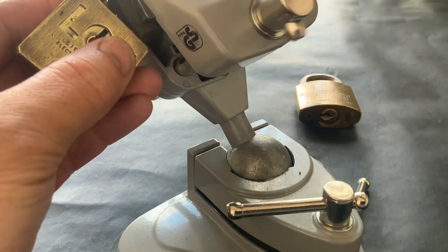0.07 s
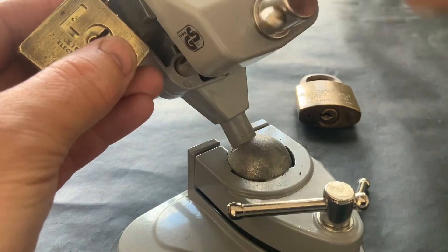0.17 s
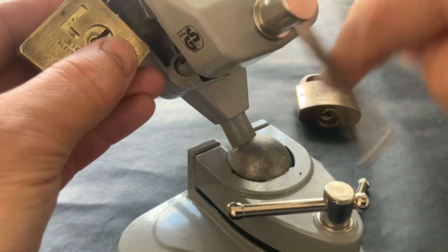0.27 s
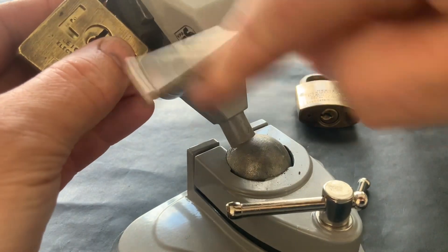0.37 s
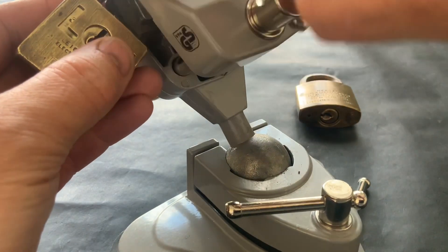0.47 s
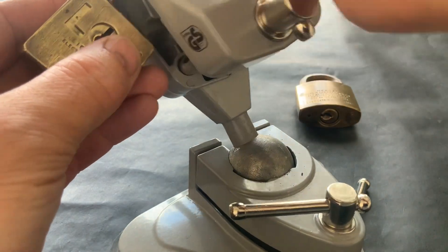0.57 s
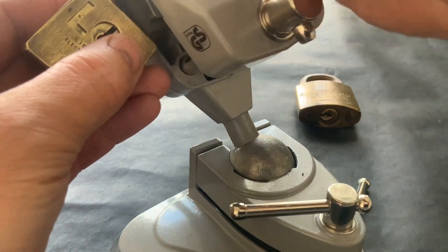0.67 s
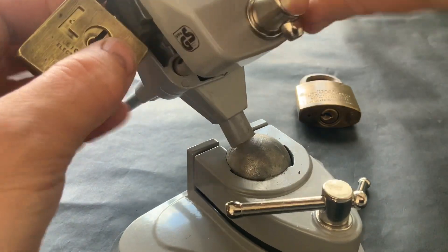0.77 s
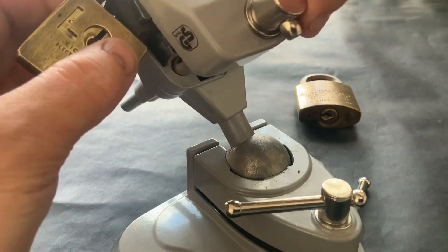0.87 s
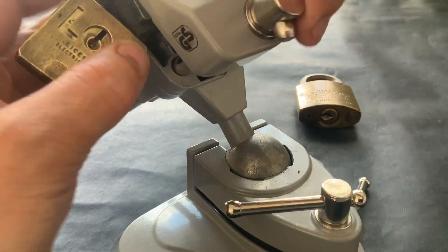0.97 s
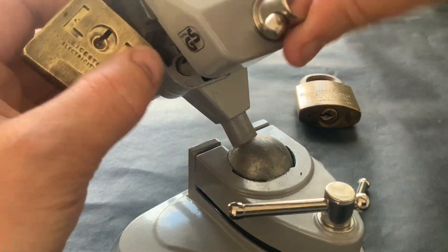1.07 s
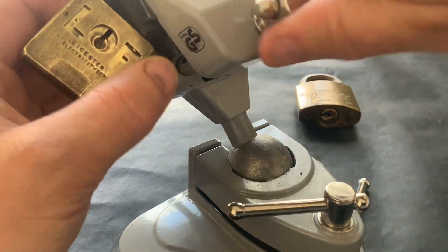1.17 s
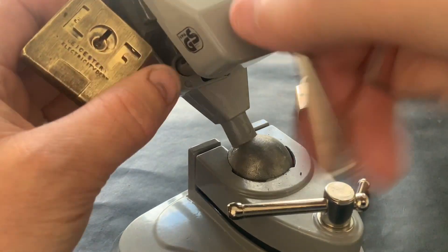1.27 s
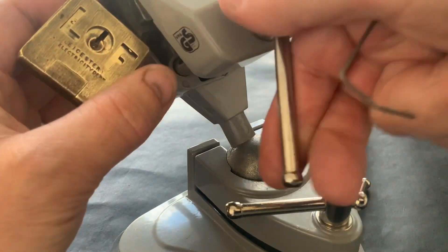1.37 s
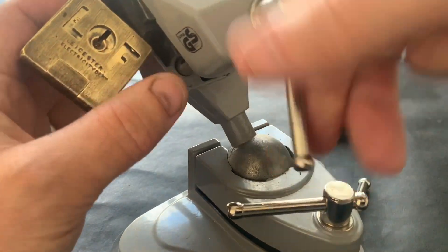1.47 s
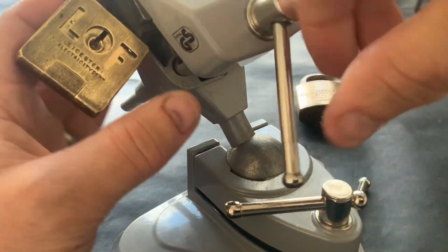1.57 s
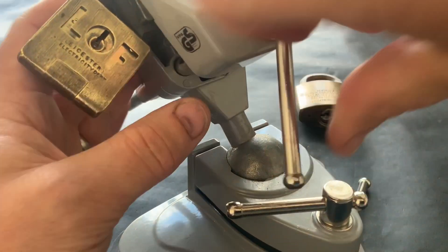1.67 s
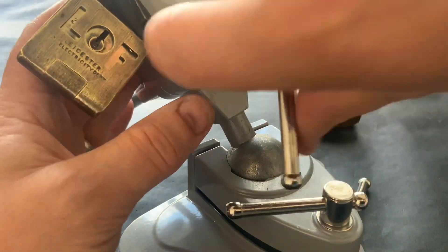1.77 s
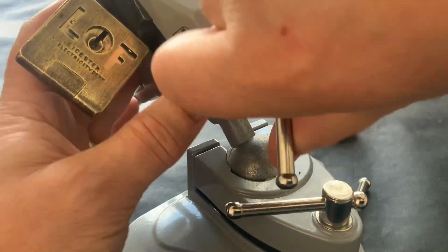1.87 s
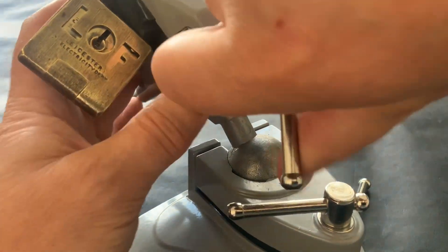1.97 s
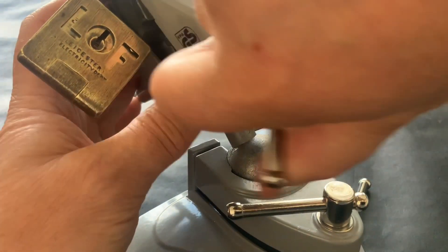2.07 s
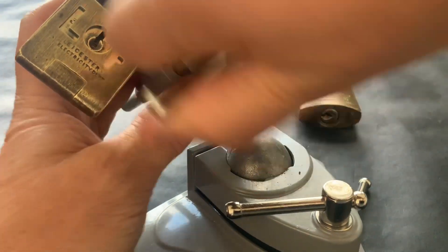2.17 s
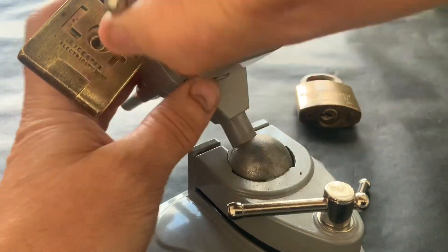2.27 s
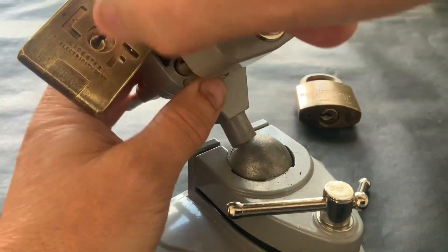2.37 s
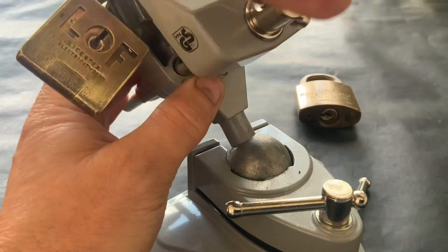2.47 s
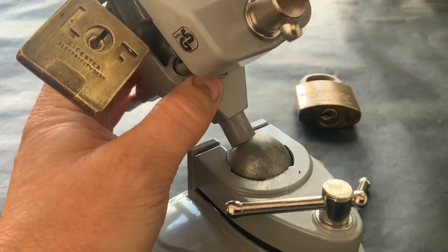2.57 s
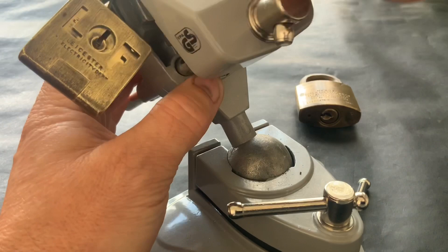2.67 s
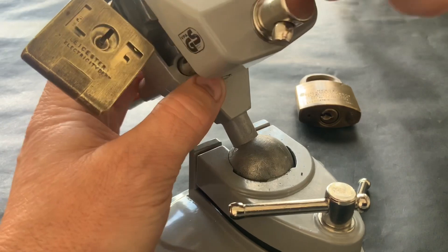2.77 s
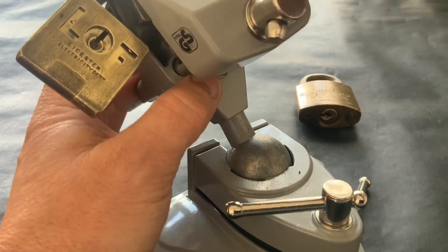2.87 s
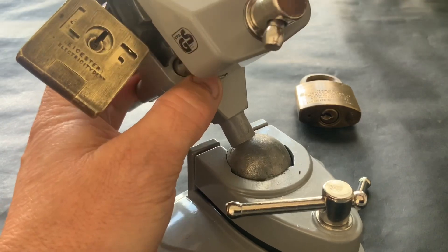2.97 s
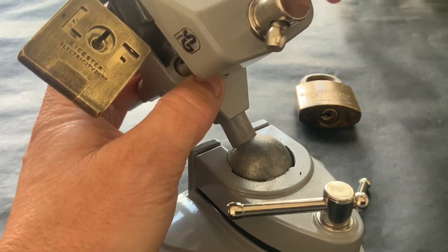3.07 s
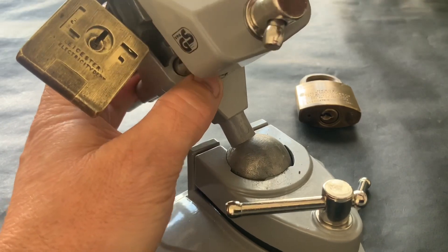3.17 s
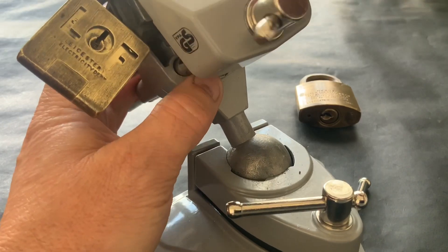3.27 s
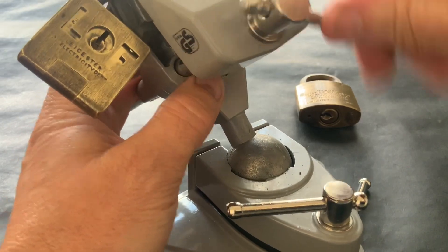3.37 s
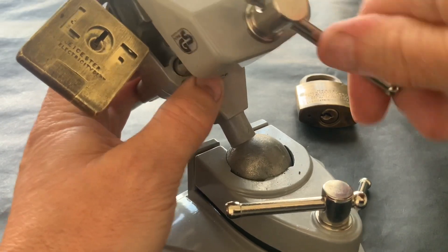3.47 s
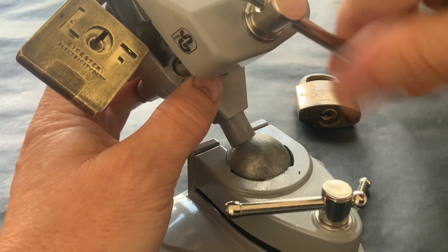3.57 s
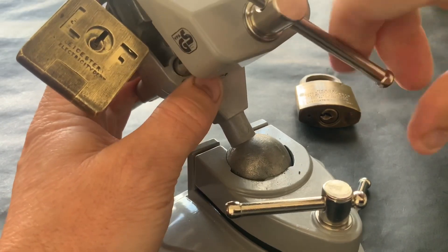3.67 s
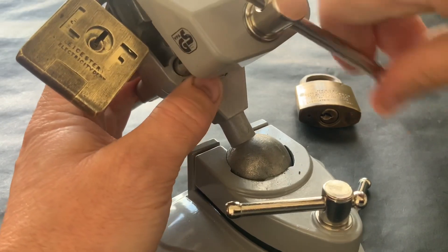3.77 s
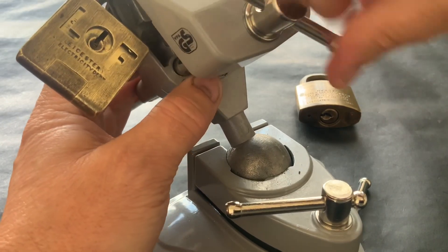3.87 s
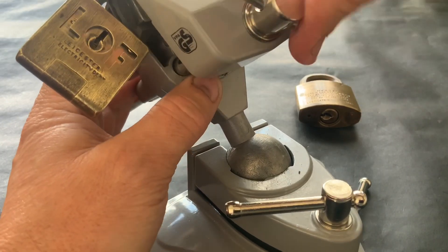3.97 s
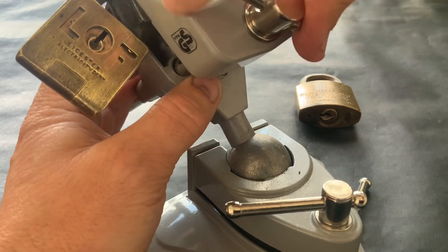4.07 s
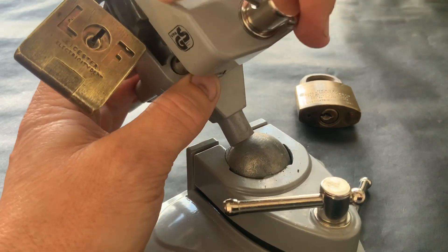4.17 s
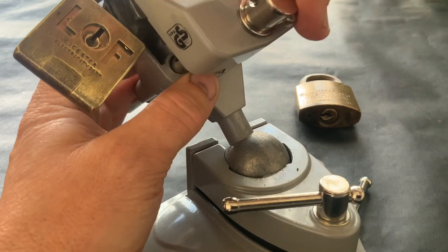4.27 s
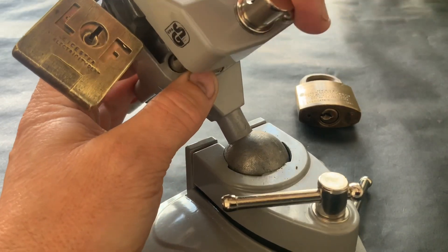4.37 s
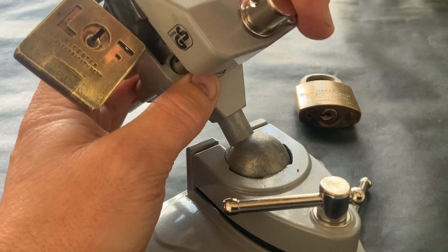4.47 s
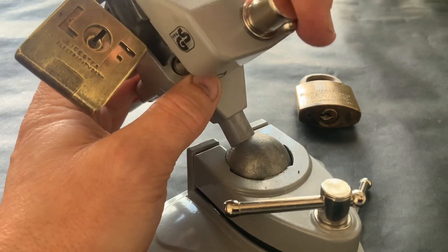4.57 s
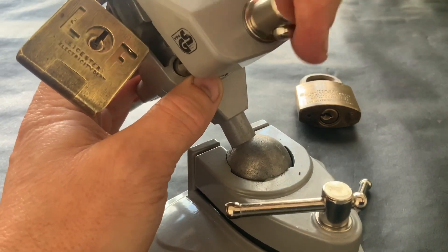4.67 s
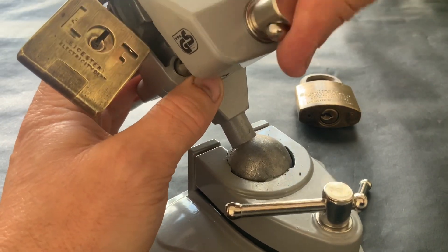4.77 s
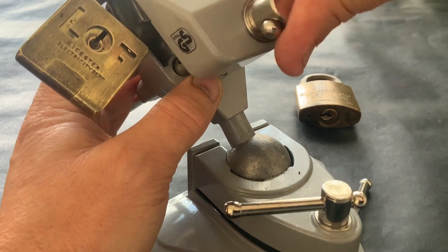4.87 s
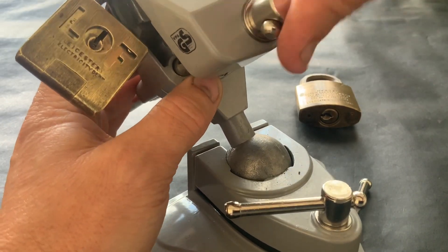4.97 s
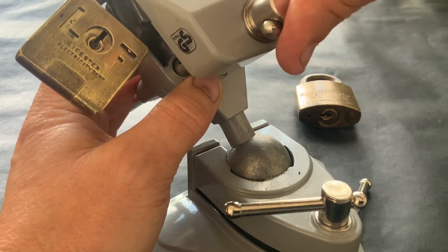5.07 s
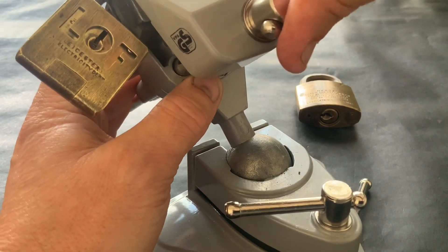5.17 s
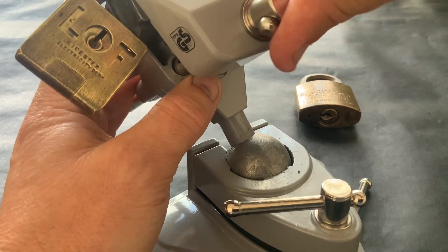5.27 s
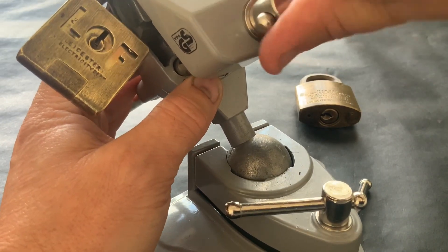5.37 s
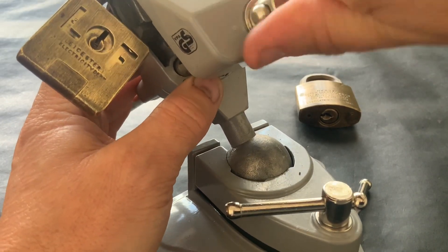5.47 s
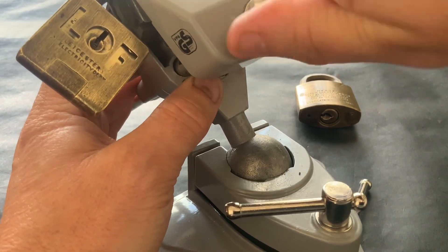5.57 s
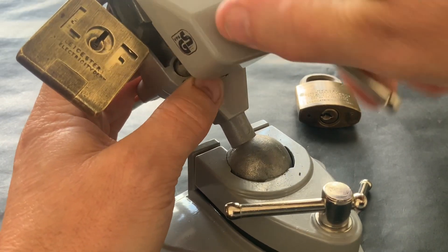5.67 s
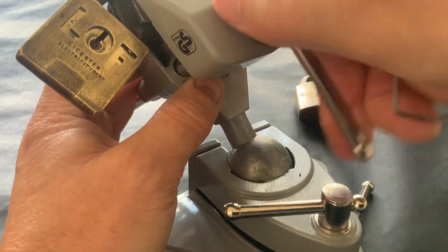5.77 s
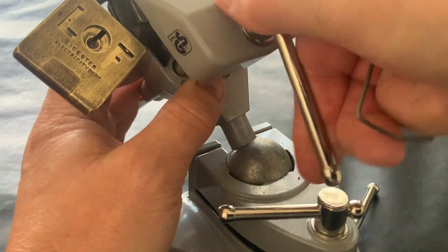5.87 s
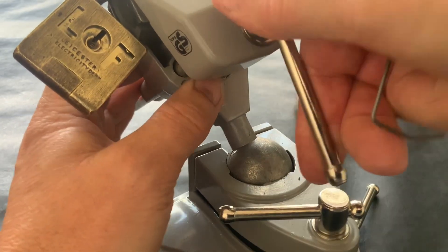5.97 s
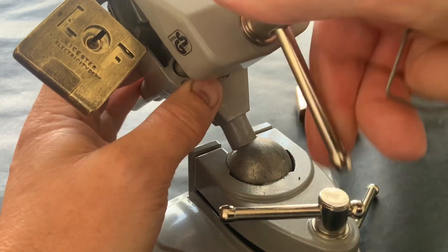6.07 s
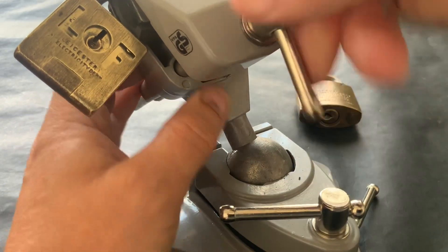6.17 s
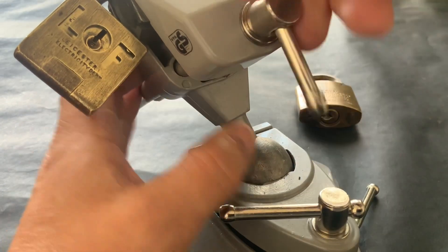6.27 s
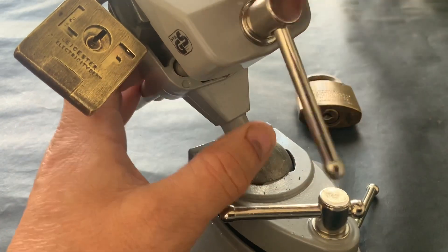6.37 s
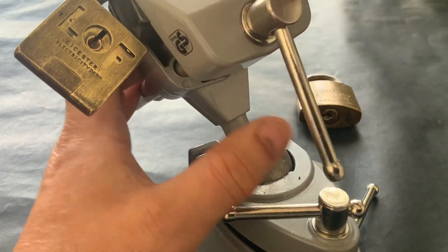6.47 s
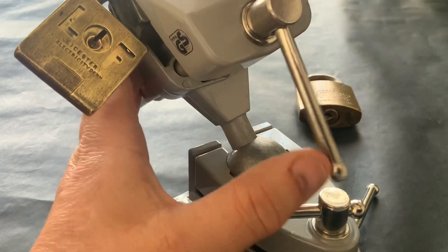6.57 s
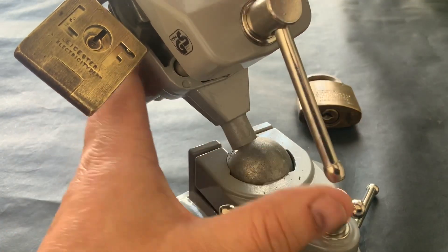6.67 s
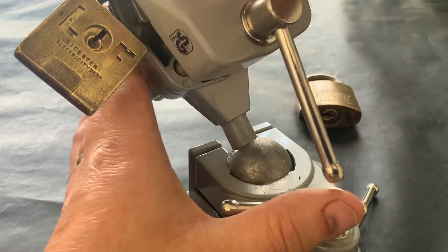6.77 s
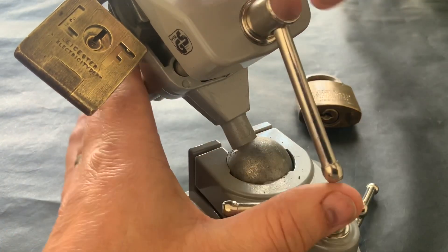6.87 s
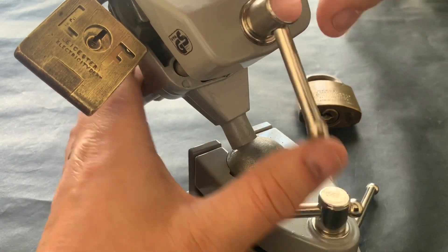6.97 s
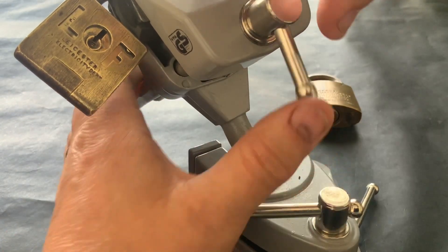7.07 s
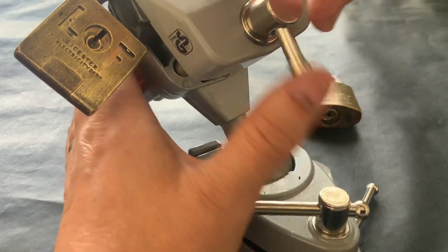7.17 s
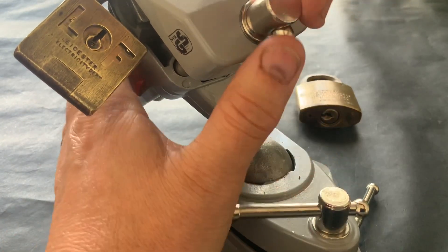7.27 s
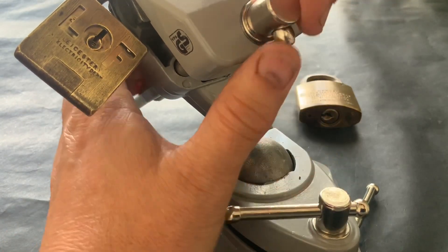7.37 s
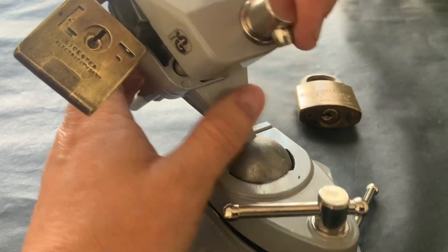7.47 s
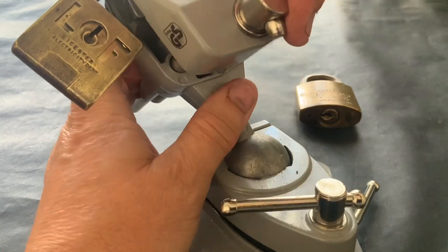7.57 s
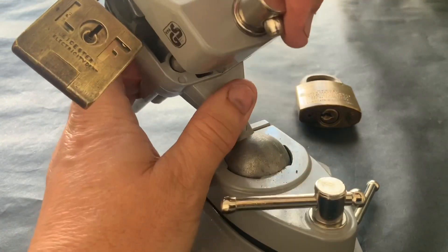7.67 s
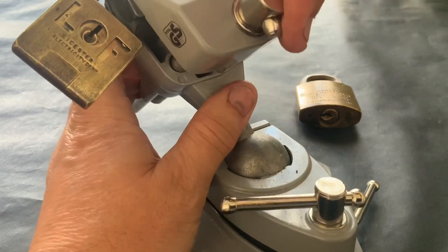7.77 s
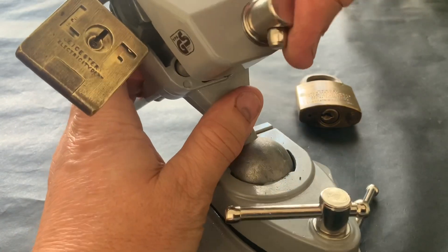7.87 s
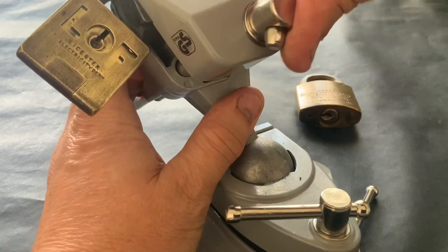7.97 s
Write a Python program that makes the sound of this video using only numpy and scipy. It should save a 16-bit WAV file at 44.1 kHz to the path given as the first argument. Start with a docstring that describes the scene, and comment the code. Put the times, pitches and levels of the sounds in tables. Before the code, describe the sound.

A small cast vise is worked close to stereo microphones in a quiet room, slightly nearer the right. From 0 to 0.45 s come crowded hollow knocks, a rough scrape, small clinks, soft bench thumps and a tiny groan. Sparse ticks and faint rubbing follow. At 1.2 s the screw judders in a brief buzzing burst, then at 1.45 to 1.5 s the steel handle clinks brightly. Quiet knocks, scuffs and a dull thump at 2.8 s lead to a hissing scrape with a short dry squeak at 3.75 to 3.9 s, ending in a bright clink. From 4 to 5.6 s it is nearly still, just faint knocks. Near 6.1 s scraping resumes; at 6.26 to 6.35 s the handle drops through with the loudest, high singing clatter, and another clink at 6.5 s. Scrapes and a double clink come around 6.85 to 7.2 s, a soft thump at 7.4 s, then light rubbing over low room noise and hiss.

```python
"""A knock, a scrape and a steel clink come first: a padlock is clamped in a small bench vise,
close to the microphones in a small room. The screw scrapes as it turns and once judders; the loose
handle slides through its hole and clinks against its stops; hands bump the bench. Contacts are
noise cracks over dying modes, friction is coloured noise and tones, and room and hiss lie behind."""
import sys
import numpy as np
from scipy import signal
from scipy.fft import rfft, irfft
from scipy.io import wavfile

SR = 44100
rng = np.random.default_rng(int(sys.argv[2]) if len(sys.argv) > 2 else 0)


def generate_wav(sig):
    """Save sig (samples, or channels by samples) to the path in sys.argv[1] as 16-bit PCM at SR."""
    pcm = np.round(np.clip(np.atleast_2d(sig).T, -1, 1) * 32767).astype(np.int16)
    wavfile.write(sys.argv[1], SR, pcm)


N = 353020
TIME = np.arange(N) / SR  # seconds


def amp(db):
    """Decibels to gain."""
    return 10 ** (np.asarray(db) / 20)


def unit(x):
    """Scales to rms 1."""
    return x / np.sqrt(np.mean(x ** 2) + 1e-20)


def blow(x):
    """Scales a short sound so that its energy equals a hundredth of a second at rms 1."""
    return x / np.sqrt(np.sum(x ** 2) / (SR / 100) + 1e-20)


def read(points, hz):
    """Reads a spectrum on a log-frequency axis."""
    f, value = np.transpose(points)
    return np.interp(np.log(hz + 1), np.log(f), value)


def level(s, db):
    """A gain curve in dB, silent outside its span."""
    return amp(np.interp(TIME, s, db, left=-200, right=-200))


def add(mix, s, sound):
    """Mixes a sound in at time s."""
    part = mix[max(round(s * SR), 0):][:len(sound)]
    part += sound[:len(part)]


def response(points, size=2048):
    """Causal (minimum-phase) impulse response with the given spectrum."""
    hz = abs(np.fft.fftfreq(size, 1 / SR))
    log_gain = np.log(amp(read(points, hz)))
    return np.fft.ifft(np.exp(np.conj(signal.hilbert(log_gain)))).real[:size // 2]


def colour(x, points):
    """Passes x through a spectrum."""
    return signal.oaconvolve(x, response(points))[:len(x)]


def drift(hz):
    """Slow random wander, with hz fresh values of rms 1 per second joined by lines."""
    knots = rng.standard_normal(N // 20)
    return np.interp(TIME * hz, np.arange(len(knots)), knots)


def held(start, length, rise, release):
    """Gain of one movement: it builds up, holds, and dies away."""
    age = np.maximum(TIME - start, 0)
    return np.minimum(age / rise, 1) * np.exp(-np.clip((age - length) / release, 0, 20))


def arch(start, length):
    """Gain that swells and fades with the speed of one sweep of the hand."""
    return np.sin(np.pi * np.clip((TIME - start) / length, 0, 1))


def ring(modes, t, detune, spread_db):
    """Dying modes; each blow lands elsewhere and weights them anew."""
    hz, db, t60 = np.transpose(modes)[:, :, None]
    shift, weight, sign = rng.standard_normal((3, len(modes), 1))
    gain = np.sign(sign) * amp(db + spread_db * weight)
    decay = np.exp(-np.log(1000) * t / t60)
    tones = np.sin(2 * np.pi * hz * (1 + detune * shift) * t)
    return (gain * decay * tones).sum(0)


def crack(body, t, rise, decay):
    """A few milliseconds of chatter between two metal faces, heard through a body's response."""
    chatter = rng.standard_normal(len(t)) * (1 - np.exp(-t / rise)) * np.exp(-t / decay)
    return signal.fftconvolve(chatter, body)[:len(t)]


# Modes of the cast body, listed for a knock pitched at KNOCK_HZ.
# Each row: frequency in Hz, relative level in dB, 60 dB decay time in seconds.
VISE_MODES = [(375, -17, 0.063), (497, -12.5, 0.074), (590, -9.5, .04), (724.4, -1.5, .045),
              (819.7, -0.5, 0.03), (873, -4.5, .03), (1032, -8, 0.033), (1459, -17.5, 0.058),
              (1556, -18, .025)]
KNOCK_HZ = 780
# Colour of the clack of a contact. Each row: frequency in Hz, relative level in dB.
CLACK_COLOUR = [(600, -29), (1200, 2.5), (1550, 7), (1950, -3.5), (2350, -4.5), (2900, -5), (4100, -3.5),
                (4700, -1), (5400, -5.5), (5950, 1.5), (7000, -8.5), (7550, -4.5), (9300, -8.5),
                (12000, -33)]
# Colour of its bright tick. Each row: frequency in Hz, relative level in dB.
TICK_COLOUR = [(5000, -27), (6100, -7.5), (7300, -19), (8500, -9), (9500, -12), (11000, -5.5),
               (11450, -11.5), (12100, -2.5), (12700, -6), (13300, -2), (14000, -6.5), (14600, -6.5),
               (15300, -3.5), (16500, -13.5)]
CLACK_RISE_S = .0005  # time constant of a hard contact's crack


def contact(t, body_db, clack_db, tick_db, body_hz, dull_hz=3800):
    """A contact cracks and, a little more slowly, rocks the cast body."""
    modes = [(hz * body_hz / KNOCK_HZ, db, t60) for hz, db, t60 in VISE_MODES]
    knock = ring(modes, t, detune=.03, spread_db=2) * (1 - np.exp(-t / .003))
    # a soft contact, with more knock than clack, builds more slowly and is duller
    hardness = np.clip(amp((clack_db - body_db) / 2), .3, 1)
    lowpass = signal.butter(1, 2 * dull_hz * hardness, fs=SR)
    dulled = signal.lfilter(*lowpass, response(CLACK_COLOUR))
    clack = crack(dulled, t, rise=CLACK_RISE_S / hardness, decay=.0036)
    tick = crack(response(TICK_COLOUR), t, rise=CLACK_RISE_S, decay=.0036)
    return amp(body_db) * blow(knock) + amp(clack_db) * blow(clack) + amp(tick_db) * blow(tick)


# Modes of the loose steel handle.
# Each row: frequency in Hz, relative level in dB, 60 dB decay time in seconds.
HANDLE_MODES = [(10972, 0, .032), (10860, -16, .04), (11090, -22, .03), (13400, -22, .03)]
# The loose handle strikes its stops. Each row: start in seconds, then the levels in dB of
# vise body, clack, bright tick and handle ring.
CLINKS = [(0.033, -30, -38.5, -53.5, -30.5), (0.18, -43, -48, -46, -70.5),
          (0.226, -33.5, -30.5, -28.5, -43.5), (0.262, -33, -32.5, -49, -54), (1.454, -40, -46, -48, -43.5),
          (1.4605, -24.5, -30.5, -23, -34.5), (1.4823, -40.5, -40, -17, -13), (2.87, -41, -46, -51.5, -64),
          (3.729, -38, -38, -43.5, -59), (3.904, -31, -30, -23.5, -24.5),
          (4.356, -49.5, -53.5, -55.5, -69.5), (6.063, -32, -33.5, -31.5, -47.5),
          (6.26, -38.5, -37.5, -34.5, -34), (6.2784, -26.5, -22.5, -14, -17.5),
          (6.2917, -27, -50.5, -19, -21), (6.32, -24, -25.5, -11.5, -44), (6.337, -39, -52, -30.5, -38.5),
          (6.479, -37.5, -37.5, -27, -33), (7.051, -38.5, -37.5, -30.5, -52), (7.15, -29, -31, -25, -32),
          (7.163, -30, -32, -23, -46.5)]
CLINK_HZ = 783  # pitch of the body when the handle strikes it
# Play in the screw and jaws knocks the cast body, whose pitch shifts with the grip.
# Each row: start in seconds, vise body level in dB, clack level in dB, body pitch in Hz.
KNOCKS = [(0.001, -34, -42.5, 858), (0.168, -36, -55, 888), (0.297, -26.5, -78, 741),
          (0.362, -27.5, -51, 719), (0.373, -54, -59, 690), (0.397, -32.5, -59.5, 785),
          (0.692, -55.5, -60.5, 730), (1.345, -38.5, -62, 718), (1.678, -55, -64, 790),
          (1.725, -42.5, -55.5, 759), (1.855, -39, -56, 698), (2.645, -53.5, -49.5, 726),
          (2.715, -51, -61.5, 581), (3.135, -49, -59, 728), (3.335, -48, -74, 715),
          (3.474, -41, -58.5, 709), (3.517, -44.5, -64, 746), (3.992, -46, -52.5, 758),
          (4.033, -45.5, -63, 772), (4.107, -54, -79, 827), (4.143, -46.5, -72.5, 772),
          (4.743, -62, -88.5, 700), (4.99, -50.5, -91.5, 677), (5.177, -57.5, -70, 719),
          (5.669, -50.5, -56.5, 683), (5.71, -45, -75, 720), (5.892, -51, -60, 706), (5.94, -63, -81, 780),
          (6.014, -37, -56.5, 678), (6.116, -34.5, -42, 1094), (6.706, -48, -55, 721),
          (6.932, -40.5, -44.5, 957), (7.197, -61, -38, 763), (7.373, -56, -51.5, 746),
          (7.838, -45.5, -61, 649)]
KNOCK_TICK_DB = -14  # bright tick of a knock, relative to its clack


def contacts():
    """The handle rings when it hits its stops; the screw and jaws only knock."""
    out, t = np.zeros(N), np.arange(SR // 5) / SR
    for s, body_db, clack_db, tick_db, ring_db in CLINKS:
        clink = ring(HANDLE_MODES, t, detune=.0003, spread_db=1) * (1 - np.exp(-t / .001))
        strike = contact(t, body_db, clack_db, tick_db, CLINK_HZ)
        add(out, s, strike + amp(ring_db) * blow(clink))
    for s, body_db, clack_db, body_hz in KNOCKS:
        add(out, s, contact(t, body_db, clack_db, clack_db + KNOCK_TICK_DB, body_hz))
    return out


# Colour of the body under friction. Each row: frequency in Hz, relative level in dB.
BODY_COLOUR = [(100, -19.5), (220, -17.5), (320, -19.5), (490, -9.5), (590, -15.5), (730, -6), (840, -11.5),
               (1000, -21), (1250, -21.5), (2500, -68)]
# Colour of the rasp. Each row: frequency in Hz, relative level in dB.
RASP_COLOUR = [(600, -28.5), (1200, -0.5), (1520, 1), (2000, -1.5), (2400, -1.5), (2900, -3), (3700, -6.5),
               (4700, -1.5), (6000, -11), (7200, -10), (9000, -11.5), (13000, -39)]
# Each turn of the screw scrapes.
# Each row: start in seconds, length in seconds, vise body level in dB, rasp level in dB.
SCRAPES = [(0.0, 0.31, -44, -61.5), (0.224, 0.093, -36, -42.5), (0.331, 0.081, -36, -38.5),
           (0.87, 0.66, -62, -73), (1.352, 0.22, -52.5, -55), (1.916, 0.069, -58, -69),
           (2.79, 0.08, -55, -65.5), (2.852, 0.076, -54, -73), (3.231, 0.15, -56.5, -71.5),
           (3.436, 0.049, -47, -74), (3.678, 0.049, -57, -76), (3.741, 0.074, -40.5, -50.5),
           (3.803, 0.11, -38.5, -54), (4.715, 0.14, -76, -102), (5.177, 0.069, -66, -82.5),
           (5.682, 0.089, -53, -53.5), (5.779, 0.045, -59.5, -61.5), (5.867, 0.17, -61, -68.5),
           (6.079, 0.057, -45, -42), (6.208, 0.042, -55.5, -49.5), (6.85, 0.07, -48, -42.5),
           (7.064, 0.23, -50, -55.5), (7.375, 0.13, -61.5, -68), (7.819, 0.04, -53.5, -66)]
SCRAPE_RISE_S, SCRAPE_RELEASE_S = .031, .011
SCRAPE_FIZZ_DB = -17  # fizz of a scrape, relative to its rasp


def scraping(slips_per_s=1000):
    """Tiny slips of rough metal, in clumps, excite the same body; each slip chatters for a moment."""
    size = amp(2.8 * np.minimum(rng.exponential(1, N), 4))
    clumps = amp(3 * drift(130))
    slips = size * clumps * (rng.random(N) < slips_per_s / SR)
    fading = np.exp(-TIME[:SR // 100] / .0007)
    pressure = signal.oaconvolve(slips ** 2, fading)[:N]
    chatter = np.sqrt(abs(pressure)) * rng.standard_normal(N)
    body_gain, rasp_gain = np.zeros((2, N))
    for start, length, body_db, rasp_db in SCRAPES:
        turn = held(start, length, SCRAPE_RISE_S, SCRAPE_RELEASE_S)
        body_gain += amp(body_db) * turn
        rasp_gain += amp(rasp_db) * turn
    body = unit(colour(chatter, BODY_COLOUR))
    fizz = unit(colour(chatter, TICK_COLOUR))
    rasp = unit(colour(chatter, RASP_COLOUR)) + amp(SCRAPE_FIZZ_DB) * fizz
    return body_gain * body + rasp_gain * rasp


# Fingers and handle glide over smooth metal with a fine hiss.
# Each row: start in seconds, length in seconds, hiss level in dB.
GLIDES = [(0.07, 0.19, -56.5), (0.72, 0.16, -62.5), (0.876, 0.66, -68), (1.37, 0.09, -56),
          (1.879, 0.12, -61.5), (2.01, 0.18, -60.5), (2.15, 0.2, -68), (2.4, 0.48, -66), (3.155, 0.23, -61),
          (3.43, 0.15, -65), (3.764, 0.059, -38), (3.849, 0.1, -41.5), (4.44, 0.32, -77.5),
          (5.23, 0.63, -75.5), (5.74, 0.1, -59), (5.923, 0.21, -63), (6.08, 0.38, -52.5),
          (6.664, 0.15, -61.5), (6.81, 0.45, -54.5), (7.327, 0.16, -56.5), (7.48, 0.2, -64),
          (7.68, 0.34, -69.5)]
GLIDE_RASP_DB, GLIDE_BODY_DB = -9.5, -6  # relative to the hiss


def gliding(grain_db=3.5):
    """Smooth friction hisses in the same metal, louder the faster the hand moves."""
    speed = sum(amp(db) * arch(start, length) for start, length, db in GLIDES)
    rub = rng.standard_normal(N) * amp(grain_db * drift(120))
    hiss = unit(colour(rub, TICK_COLOUR))
    rasp = amp(GLIDE_RASP_DB) * unit(colour(rub, RASP_COLOUR))
    body = amp(GLIDE_BODY_DB) * unit(colour(rub, BODY_COLOUR))
    return speed * (hiss + rasp + body)


# Colour of the shaken frame. Each row: frequency in Hz, relative level in dB.
BUZZ_COLOUR = [(330, -22), (700, 1.5), (1000, 0), (1330, -4.5), (1950, -6), (2450, -12), (3000, -11),
               (5500, -12), (8000, -16.5), (12000, -9), (16000, -21.5)]
# The screw sticks and slips in bursts, harsh at first, then humming.
# Each row: start in seconds, length in seconds, slips per second, hum level in dB, buzz level in dB.
JUDDERS = [(1.207, 0.027, 315, -26.5, -25.5), (1.24, 0.006, 372, -39, -56), (1.262, 0.015, 318, -28.5, -52),
           (1.288, 0.029, 368, -52.5, -61.5)]
JUDDER_RISE_S, JUDDER_RELEASE_S = .008, .006


def judder(grit=.85):
    """The screw sticks and slips; each slip rings the frame, sharply at first, then as a softer hum."""
    s, _, slip_hz, _, _ = np.transpose(JUDDERS)
    rate = np.interp(TIME, s, slip_hz) * (1 + .03 * drift(400))
    cycles = np.cumsum(rate) / SR
    slips = np.diff(np.floor(cycles), prepend=0)  # one impulse per cycle
    frame = crack(response(BUZZ_COLOUR), np.arange(SR // 40) / SR, rise=.0003, decay=.0015)
    rattle = unit(signal.oaconvolve(slips, frame)[:N])
    buzz = rattle + grit * unit(colour(rng.standard_normal(N), BUZZ_COLOUR))
    hum = unit(np.sin(2 * np.pi * cycles))
    out = np.zeros(N)
    for start, length, _, hum_db, buzz_db in JUDDERS:
        burst = held(start, length, JUDDER_RISE_S, JUDDER_RELEASE_S)
        out += burst * (amp(hum_db) * hum + amp(buzz_db) * buzz)
    return out


# the handle drops through its hole, singing and chattering: start and length in s, levels in dB
SLIDE_S, SLIDE_LENGTH_S, SING_DB, CHATTER_DB = 6.28, .043, -15, -30


def sliding_handle(rasp_db=-4):
    """Friction keeps the handle's strongest mode going while it chatters through its hole."""
    handle_hz = HANDLE_MODES[0][0]
    tone = unit(np.sin(2 * np.pi * handle_hz * TIME + .3 * drift(83)))
    rub = rng.standard_normal(N) * amp(5.7 * drift(450))
    chatter = unit(colour(rub, TICK_COLOUR)) + amp(rasp_db) * unit(colour(rub, CLACK_COLOUR))
    slide = held(SLIDE_S, SLIDE_LENGTH_S, rise=.0021, release=.0071)
    return slide * (amp(SING_DB) * tone + amp(CHATTER_DB) * chatter)


# The dry screw groans in short tones, sometimes on several resonances at once; a row of no
# length stays silent.
# Each row: start in seconds, end in seconds, start pitch in Hz, end pitch in Hz, level in dB.
GROANS = [(0.294, 0.294, 766.6, 720, -22), (0.42, 0.434, 790, 720, -25), (3.791, 3.902, 894, 740, -39),
          (3.761, 3.92, 1530, 1480, -47.5), (3.761, 3.823, 2680, 2800, -48),
          (5.206, 5.28, 291.7, 343, -61.5)]


def groans(waver=.023):
    """Friction locks onto resonances, each giving a short, wavering tone."""
    out, wander, tremble = np.zeros(N), drift(250), unit(amp(2.5 * drift(150)))
    for start, end, start_hz, end_hz, db in GROANS:
        hz = np.interp(TIME, [start, end], [start_hz, end_hz]) * (1 + waver * wander)
        swell = np.sqrt(arch(start, end - start))
        tone = unit(np.sin(2 * np.pi * np.cumsum(hz) / SR))
        out += amp(db) * swell * tremble * tone
    return out


# Light ticks of the screw that ring briefly. Each row: start in seconds, level in dB, pitch in Hz.
SCREW_TICKS = [(0.651, -67, 1770), (0.793, -49.5, 1980), (2.412, -61.5, 2160), (2.873, -52, 1500),
               (3.475, -51, 1503), (4.357, -54.5, 1460), (5.052, -59.5, 1950), (5.569, -68.5, 4120),
               (5.72, -50.5, 5700), (6.521, -51, 3710), (7.114, -46, 3310)]


def screw_ticks():
    """The thread lets go with a small, dry tick around one pitch."""
    out, t = np.zeros(N), np.arange(SR // 20) / SR
    for s, db, hz in SCREW_TICKS:
        body = response([(hz / 2, -34), (hz * .85, -10), (hz, 0),
                         (hz * 1.2, -17), (hz * 2, -25), (hz * 5, -36)])
        add(out, s, amp(db) * blow(crack(body, t, rise=.002, decay=.003)))
    return out


# Skin shifts its grip on the vise.
# Each row: start in seconds, level in dB before the grip's trim, length in seconds.
SCUFFS = [(0.145, -46.5, 0.33), (0.234, -44.5, 0.16), (0.866, -59, 0.064), (1.741, -61, 0.091),
          (1.859, -61.5, 0.14), (3.3, -48.5, 0.083), (3.404, -63.5, 0.072), (3.738, -57.5, 0.31),
          (4.718, -59.5, 0.069), (5.171, -58.5, 0.072), (5.643, -56, 0.12), (5.88, -50, 0.05),
          (7.832, -46.5, 0.015)]
# Dull colour of skin on metal. Each row: frequency in Hz, relative level in dB.
SKIN_COLOUR = [(50, -14), (110, -6), (160, -8), (215, 2), (290, -6), (380, -7), (480, -16), (800, -40)]


def grip(trim_db=-1):
    """Dull scuffs of skin that start quickly and fade."""
    pressure = np.zeros(N)
    for s, db, length in SCUFFS:
        times = [s, s + .012, s + length, s + length + .03]
        pressure += level(times, [db - 20, db, db - 5, db - 25])
    rub = rng.standard_normal(N) * amp(2 * drift(80))
    return amp(trim_db) * pressure * unit(colour(rub, SKIN_COLOUR))


# Soft bumps of the hands on the bench.
# Each row: start in seconds, peak level in dB before the bench's trim.
BUMPS = [(0.121, -40), (0.29, -28), (0.361, -33), (0.64, -49.5), (0.892, -44), (1.637, -47.5), (1.857, -45),
         (2.319, -55.5), (2.574, -37), (2.641, -42.5), (2.772, -29.5), (3.06, -47), (3.41, -36),
         (4.144, -53.5), (4.803, -40.5), (5.178, -49.5), (5.889, -45.5), (6.912, -46), (7.416, -29.5)]
# Modes of the bench. Each row: frequency in Hz, relative level in dB, 60 dB decay time in seconds.
BENCH_MODES = [(35.86, -18.5, 1), (71, -7, 0.45), (88, -2, 0.2), (123, -8, 0.27), (181, -15, 0.26),
               (217.4, -14, 0.16)]
BENCH_SHARE_DB = -10.5  # a clink also rocks the bench: relative to its vise body, before the trim


def bench(trim_db=-3):
    """A soft push sways the bench in a few low modes."""
    out, t = np.zeros(N), np.arange(SR // 2) / SR
    shaken = [(s, body_db + BENCH_SHARE_DB) for s, body_db, *_ in CLINKS]
    for s, db in BUMPS + shaken:
        push = 1 - np.exp(-(t / .006) ** 2)
        thud = ring(BENCH_MODES, t, detune=.02, spread_db=1) * push
        add(out, s, amp(db + trim_db) * thud / abs(thud).max())
    return out


# Decay of the small room. Each row: frequency in Hz, 60 dB decay time in seconds.
ROOM_DECAY = [(100, 1), (330, 0.38), (700, 0.27), (2000, 0.31), (5000, 0.15), (11000, 0.27), (15000, 0.03)]
# How strongly the vise excites the room. Each row: frequency in Hz, level in dB.
ROOM_SEND = [(100, -5), (220, -4.5), (300, -10), (380, -7.5), (500, -3.5), (750, -11.5), (2000, -11),
             (6000, -7.5), (9500, -15), (11000, -22.5), (12500, -15), (15000, -5.5)]


def room(x, onset_s=.0093):
    """A dense tail, each band dying at its own speed; the bass is alike on both sides."""
    hz, t, z = signal.stft(rng.standard_normal((3, SR * 3 // 4)), SR, nperseg=256)
    same = (1 / (1 + (hz / 600) ** 2))[:, None]  # share of power common to both sides
    t60 = read(ROOM_DECAY, hz)[:, None]
    sides = np.sqrt(same) * z[0] + np.sqrt(1 - same) * z[1:]
    sides = sides * np.exp(-np.log(1000) * t / t60) / np.sqrt(t60)
    tail = signal.istft(sides, SR, nperseg=256)[1]
    tail = tail * (1 - np.exp(-(TIME[:tail.shape[1]] / onset_s) ** 2))
    tail = tail / np.linalg.norm(tail[0])
    return signal.fftconvolve(colour(x, ROOM_SEND)[None], tail, axes=1)[:, :N]


# Colour of room noise and hiss. Each row: frequency in Hz, relative level in dB.
AIR_COLOUR = [(25, 3), (70, 2), (130, -4), (300, -5.5), (520, -5.5), (750, -8.5), (1200, -25.5),
              (3000, -20), (8000, -20.5), (10000, -24.5), (12000, -21.5), (14800, -17.5), (16000, -31.5)]
AIR_DB = -73  # rms level


def air():
    """Steady low room noise, alike on both sides, under unrelated microphone hiss."""
    hz = np.fft.rfftfreq(N, 1 / SR)
    shared, own = rfft(rng.standard_normal(N)), rfft(rng.standard_normal((2, N)))
    same = 1 / (1 + (hz / 400) ** 2)  # share of power common to both sides
    sides = np.sqrt(same) * shared + np.sqrt(1 - same) * own
    return amp(AIR_DB) * unit(irfft(sides * amp(read(AIR_COLOUR, hz)), N))


# Balance of the two microphones. Each row: frequency in Hz, left minus right in dB.
SIDE_TILT = [(100, -5), (520, 0.5), (720, 10), (900, 0), (1150, 8), (1550, -2), (1980, -8), (2500, -4.5),
             (3500, 1.5), (5000, -1), (8000, 3.5), (11000, -0.5), (13000, 2)]
# samples by which the left channel trails the right, for the vise body and for the bright handle
BODY_LAG, HANDLE_LAG = 47, 33
HANDLE_ABOVE_HZ = 6500  # sound above this takes the handle's lag


def scene():
    """The vise is nearer the right microphone and reaches the left later; the bench shakes both alike."""
    vise = contacts() + screw_ticks() + scraping() + gliding()
    vise = vise + groans() + grip() + judder() + sliding_handle()
    highpass = signal.butter(6, HANDLE_ABOVE_HZ, "highpass", fs=SR, output="sos")
    bright = signal.sosfiltfilt(highpass, vise)
    late = np.pad(vise - bright, (BODY_LAG, 0))[:N] + np.pad(bright, (HANDLE_LAG, 0))[:N]
    left = colour(late, [(hz, db / 2) for hz, db in SIDE_TILT])
    right = colour(vise, [(hz, -db / 2) for hz, db in SIDE_TILT])
    return np.array([left, right]) + bench() + room(vise) + air()


EDGE_HZ = 16000  # upper limit of the recorder's band


def record(dry):
    """The recorder rounds off the highest peaks, then limits the band."""
    rounded = .8 * np.tanh(dry / .8)
    lowpass = signal.firwin(255, EDGE_HZ, window=("kaiser", 9), fs=SR)
    return signal.oaconvolve(rounded, lowpass[None], "same")


dry = scene()
out = record(dry)
generate_wav(out)
```